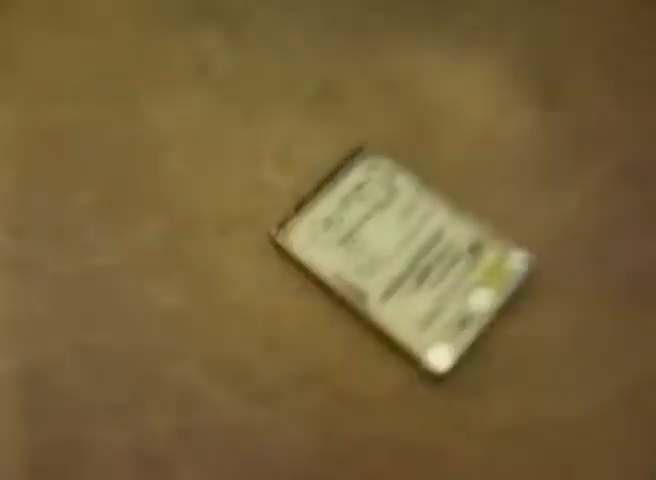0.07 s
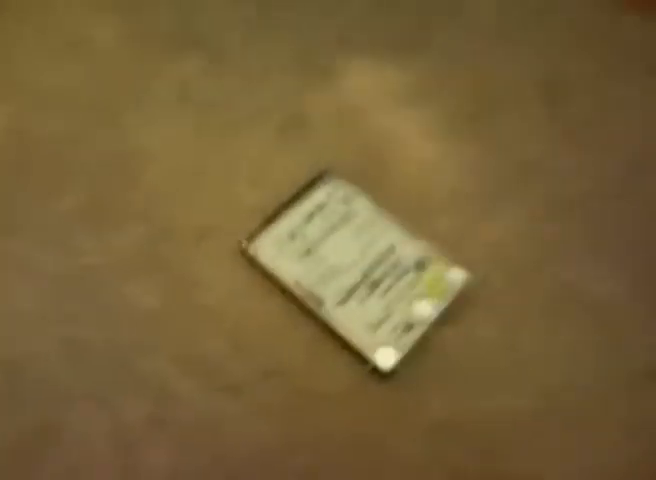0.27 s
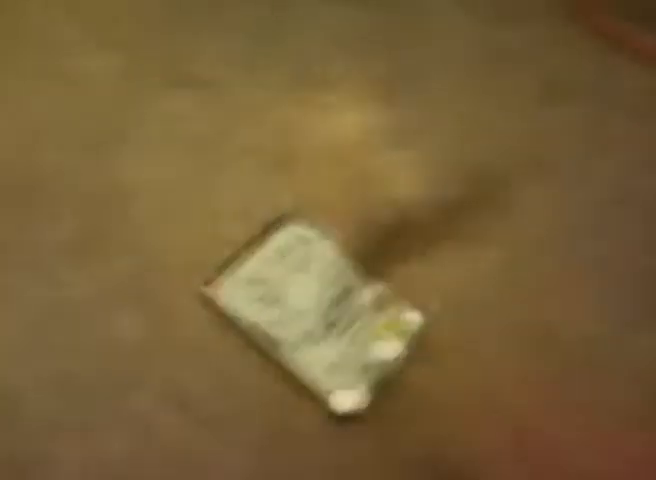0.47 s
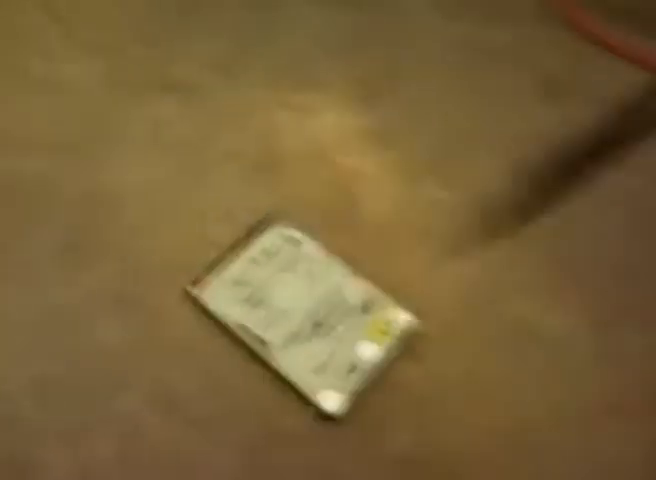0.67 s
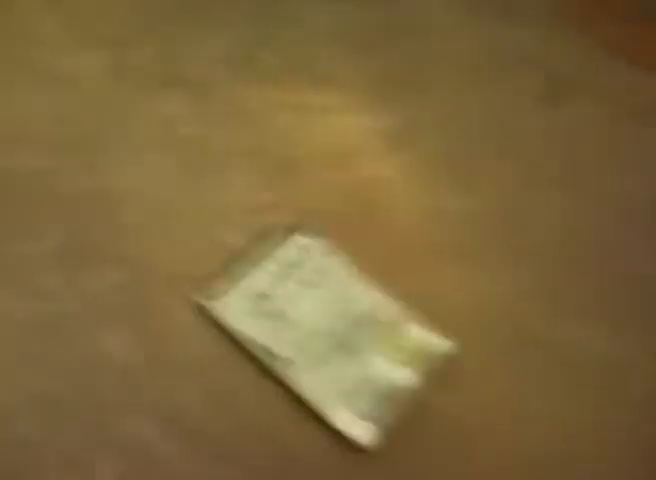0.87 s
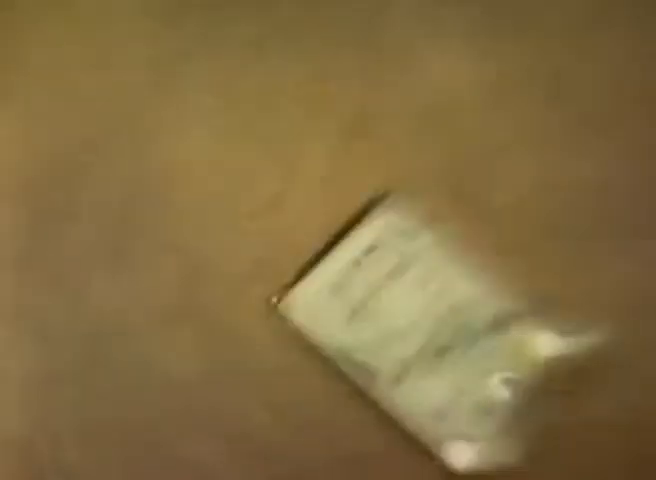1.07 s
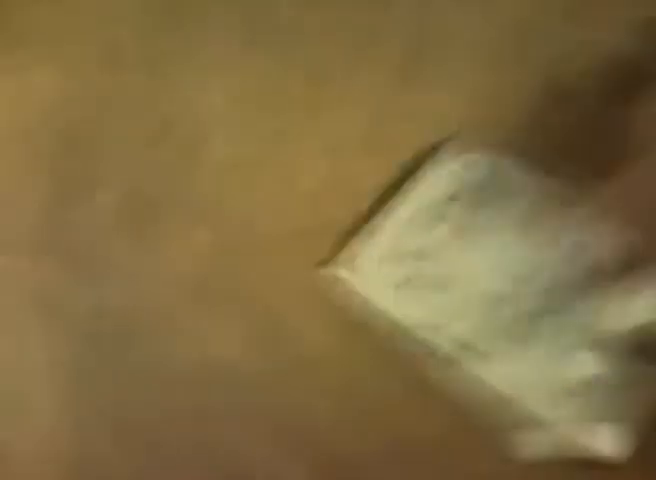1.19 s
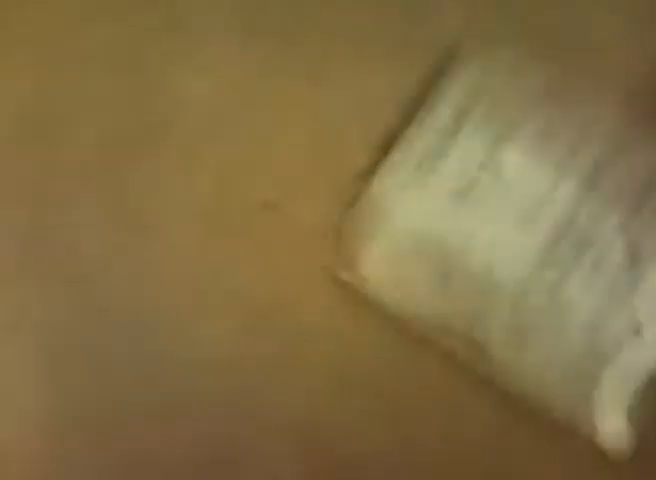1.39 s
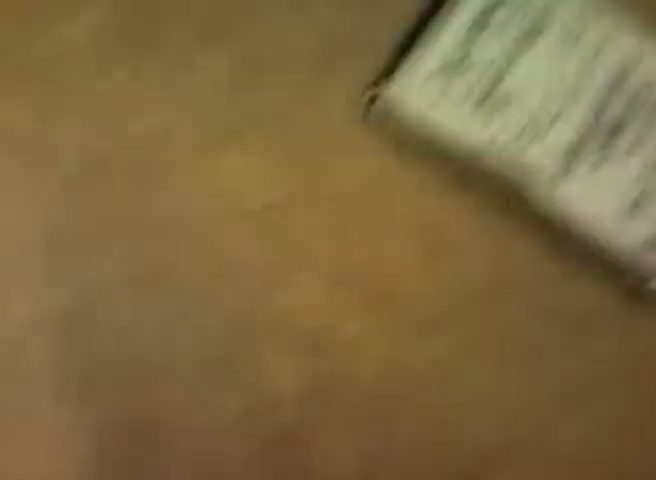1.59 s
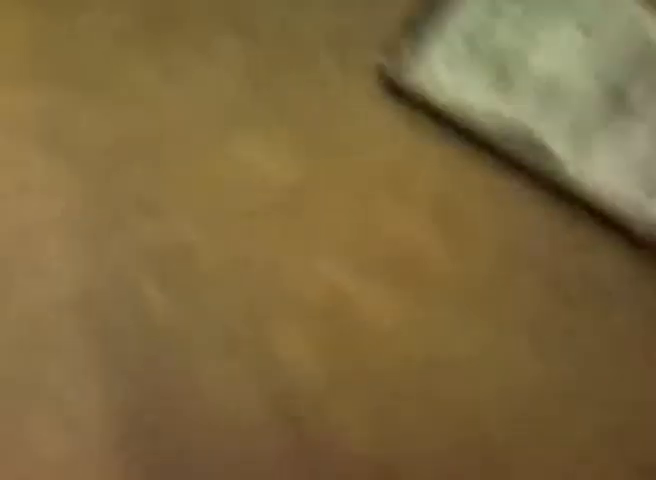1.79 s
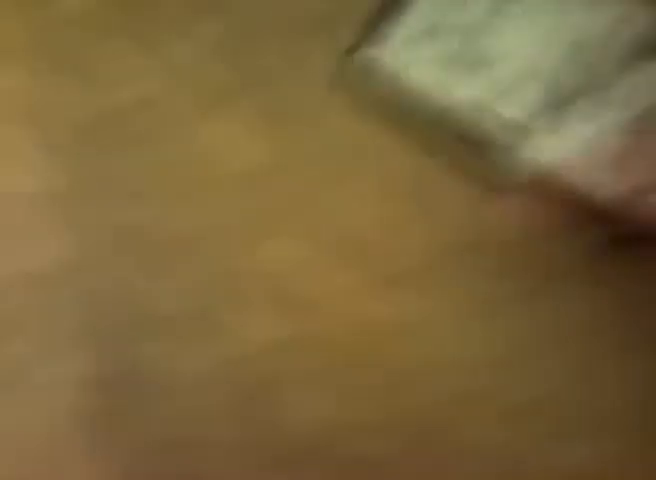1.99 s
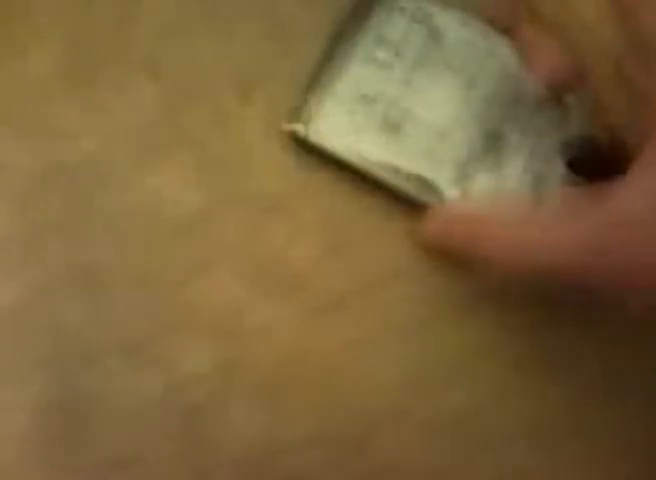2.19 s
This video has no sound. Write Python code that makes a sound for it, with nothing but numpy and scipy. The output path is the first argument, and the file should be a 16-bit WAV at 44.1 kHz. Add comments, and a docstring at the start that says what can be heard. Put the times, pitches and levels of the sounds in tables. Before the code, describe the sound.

Two loud hammer blows crack against a hard drive on concrete, followed by light clatter.

```python
"""Quiet hiss and a faint hum, then two hammer blows slam into a hard drive on a concrete floor.
Each blow makes it bounce and rattle: frame and lid crack and ring, the floor thuds, and a small hard
room answers. Small ticks and gritty scrapes follow, then a sharp clack and some clatter as the drive
is moved. It all sits in a narrow, telephone-like band; the loud blows clip with a harsh crunch."""
import sys
import numpy as np
from scipy import signal
from scipy.fft import rfft, irfft
from scipy.io import wavfile
from scipy.ndimage import uniform_filter1d

SR = 44100
rng = np.random.default_rng(int(sys.argv[2]) if len(sys.argv) > 2 else 0)


def transcribe(signal):
    """Save signal, clipped to [-1, 1], as a 16-bit WAV file at the path in sys.argv[1]."""
    frames = np.atleast_2d(signal).T
    limited = np.clip(frames, -1, 1)
    pcm = np.round(limited * 32767).astype(np.int16)
    wavfile.write(sys.argv[1], SR, pcm)


N = 99225
T = np.arange(N) / SR
HZ = np.maximum(np.arange(N + 1) * SR / (2 * N), 1)

# EQ of the steady hiss: frequency_hz, gain_db
HISS_EQ = [(20, -14.5), (45, -5.5), (90, 5), (170, -14.5), (260, -7.5), (500, -0.5), (780, 2), (1100, -1),
           (2000, -0.5), (3600, -1), (4200, -11.5)]
# EQ of the duller noise that swells over it: frequency_hz, gain_db
SWELL_EQ = [(30, -5), (90, 2.5), (200, -17.5), (600, 1.5), (1400, 0.5), (2200, -5), (4000, -8)]
# fader ride of that swell: time_s, level_db
SWELL_FADER = [(0, -42.5), (.22, -43.5), (.55, -44.5), (.76, -54.5), (.98, -42.5), (1.2, -42),
               (1.42, -44.5), (1.56, -52), (1.73, -52), (1.8, -43), (2.25, -43.5)]
# hammer blows and their bounces: start_s, level_db, tilt_db_per_octave, lid_share (0 frame, 1 lid)
BLOW_HITS = [(0.2417, -0.5, -2, 0), (0.2496, 1.5, -0.5, 0.1), (.257, -3, -1, 0.29),
             (.265, -2.5, -3.5, 0.12), (.275, -3, -2, 0.56), (.285, 1, -0.5, 0), (0.2939, 2.5, 4, .05),
             (.311, -4.5, -2, 0.23), (.3285, -12.5, 7, 0), (1.0161, -4.5, -3.5, 0.38),
             (1.0221, 1, -1.5, 0.6), (1.031, -8.5, 0.5, 0.29), (1.042, -5.5, 0.5, 1), (1.059, -10, -4, .9),
             (1.0687, -4.5, 0.5, 0.39)]
# the drive's ring, struck on frame or lid: pitch_hz, frame_db, lid_db, t60_s
DRIVE_MODES = [(632, -15.5, -5, 0.38), (750, -9, -17, 0.26), (912, -12.5, -9.5, 0.18),
               (1100, -26.5, -15, .2), (1229, 3, -13, 0.18), (1399, 3.5, -20, 0.2), (1523, -3, -18.5, 0.27),
               (1684, -8, -7, 0.2194), (1998, 0.5, -3, .2), (2520, -13, 1, .36), (2606, 0.5, -3, 0.23),
               (2874, -12.5, 4, 0.27), (3068, -14.5, -6.5, 0.2), (3587, 8, -4, 0.086)]
# EQ of the contact crack, also used for the grit: frequency_hz, gain_db
CONTACT_EQ = [(30, -14.5), (90, -28.5), (180, -15), (300, -7), (560, -0.5), (800, 0.5), (1300, 6.5),
              (2200, -0.5), (3000, 0), (3700, 2.5), (4200, -0.5)]
# decay of the small hard room: band_hz, t60_s
ROOM_DECAY = [(80, 0.49), (400, 0.34), (1400, 0.3), (3500, 0.32)]
# the floor taking the weight: start_s, pitch_hz, level_db
FLOOR_THUDS = [(0.283, 100, -8), (0.3041, 91, -6.5), (1.0258, 93.4, -3), (2.185, 91.5, -36.5)]
# light knocks of the drive and loose bits: start_s, level_db, tilt_db_per_octave
TAP_HITS = [(1.249, -18, 3.5), (1.276, -16.5, 4.5), (1.316, -27, -6), (1.357, -14.5, -3.5),
            (1.413, -38, 15.5), (1.429, -26.5, 8.5), (1.461, -27, 2), (1.8834, -14.5, 1), (1.895, -18, 1),
            (2.1677, 4.5, 2), (2.1743, -7.5, 5), (2.189, -13.5, -1.5), (2.2222, -6, -3.5),
            (2.2442, -3.5, -1.5)]
# damped resonances of the drive lying on the floor: pitch_hz, level_db, t60_s
DAMPED_MODES = [(1047, 0.5, 0.019), (2147, -0.5, 0.025), (2800, -5, .016), (3402, 1.5, 0.012),
                (3850, -13, 0.012)]
# slides of the drive over grit: start_s, length_s, level_db, tilt_db_per_octave
GRIT_SLIDES = [(1.255, .11, -39, -1), (1.40, 0.046, -37, 3.5), (1.884, 0.019, -38, -4),
               (2.18, 0.088, -30, -1)]

BAND_TOP_HZ = 3900
CLATTER_ROOM_DB = -11.5  # reverb send of the taps and scrapes


def undb(db):
    """Decibels to gain."""
    return 10 ** (np.asarray(db) / 20)


def unit(x):
    """Scale to an energy of one."""
    return x / np.sqrt(np.sum(x ** 2))


def unit_rms(x):
    """Scale to an RMS level of one."""
    return unit(x) * np.sqrt(N)


def decay(t60):
    """Envelope that falls 60 dB in t60 seconds."""
    return np.exp(-np.log(1000) * T / t60)


def curve(points):
    """Join (frequency_hz, value) points along a log frequency axis."""
    hz, value = np.array(points).T
    return np.interp(np.log(HZ), np.log(hz), value)


def colour(x, db):
    """Minimum-phase EQ, so nothing rings ahead of a hit."""
    cepstrum = irfft(db * np.log(10) / 20)
    cepstrum[1:N] *= 2
    cepstrum[N + 1:] = 0
    return irfft(rfft(x, 2 * N) * np.exp(rfft(cepstrum)))[:N]


def tilt(db_per_octave):
    """EQ of a harder or softer contact, pivoting at 1500 Hz."""
    return db_per_octave * np.log2(np.clip(HZ, 300, 4000) / 1500)


def add(out, start, x):
    """Mix x in from start seconds."""
    i = int(start * SR)
    out[i:] += x[:N - i]


def band_limit(x):
    """Steep high cut that leaves a narrow, telephone-like band."""
    rolloff = np.sqrt(1 + np.minimum(HZ / BAND_TOP_HZ, 2) ** 130)
    return irfft(rfft(x, 2 * N) / rolloff)[:N]


def noise():
    """White noise up to the high cut."""
    return band_limit(rng.standard_normal(N))


def background(hum_hz=770, waver_hz=5):
    """The bed: steady hiss, a faint wavering hum, and a duller noise that swells and fades."""
    waver = unit_rms(uniform_filter1d(rng.standard_normal(N), size=1500))
    hum = np.sqrt(2) * np.sin(2 * np.pi * np.cumsum(hum_hz + waver_hz * waver) / SR)
    fader_db = np.interp(T, *np.array(SWELL_FADER).T)
    swell = unit_rms(colour(noise(), curve(SWELL_EQ)))
    hiss = unit_rms(colour(noise(), curve(HISS_EQ)))
    return undb(-44.5) * hiss + undb(-53.5) * hum + undb(fader_db) * swell


def ring(modes, detune=0.0028):
    """Struck metal: decaying partials, with slightly new tuning and fresh phases on every hit."""
    out = np.zeros(N)
    for hz, db, t60 in modes:
        pitch_hz = hz * (1 + detune * rng.standard_normal())
        phase = np.pi * rng.standard_normal()
        out += undb(db) * decay(t60) * np.sin(2 * np.pi * pitch_hz * T + phase)
    return unit(out)


def hammer_blows(full_force_s=0.0027, crack_db=30, ring_db=13.5):
    """Each blow or bounce cracks and sets the frame and the lid ringing."""
    out = np.zeros(N)
    attack = np.minimum(T / full_force_s, 1) ** 2
    # the lid's crowded resonances brighten the crack around 2800 Hz
    lid_peak_db = 21.5 / (1 + ((HZ - 2800) / 630) ** 2)
    for start, db, slope, lid_share in BLOW_HITS:
        crack_eq = curve(CONTACT_EQ) + tilt(slope) + lid_share * lid_peak_db
        crack = unit(colour(noise() * decay(t60=0.055), crack_eq))
        metal = ring([(hz, (1 - lid_share) * frame_db + lid_share * lid_db, t60)
                      for hz, frame_db, lid_db, t60 in DRIVE_MODES])
        add(out, start, undb(db) * attack * (undb(crack_db) * crack + undb(ring_db) * metal))
    return in_room(out, send_db=-7.5)


def in_room(x, send_db, build_s=0.0047):
    """The direct sound plus diffuse reflections that build quickly and die away band by band."""
    spectrum, tail = rfft(noise(), 2 * N), np.zeros(N)
    for hz, t60 in ROOM_DECAY:
        band = curve([(centre, float(centre == hz)) for centre, _ in ROOM_DECAY])
        tail += irfft(spectrum * band)[:N] * decay(t60)
    tail *= 1 - np.exp(-T / build_s)
    tail = unit(tail) * np.sqrt(2 * BAND_TOP_HZ / SR)  # about unity gain below the high cut
    return x + undb(send_db) * signal.fftconvolve(x, tail)[:N]


def floor_thuds(rise_s=0.0078):
    """The low end: a few heavy cycles as the floor takes the weight."""
    out, age = np.zeros(N), T / rise_s
    bump = (age * np.exp(1 - age)) ** 4
    for start, hz, db in FLOOR_THUDS:
        add(out, start, -undb(db) * bump * np.sin(2 * np.pi * hz * T))
    return in_room(out, send_db=-15)


def taps(ring_db=2, snap_db=-2.5):
    """Ticks and clacks of the drive and loose bits: a choked ring under a snap of noise."""
    out = np.zeros(N)
    for start, db, slope in TAP_HITS:
        body = undb(ring_db) * ring(DAMPED_MODES)
        snap = undb(snap_db) * unit(noise() * decay(t60=0.035))
        add(out, start, undb(db) * colour(body + snap, tilt(slope)))
    return in_room(out, CLATTER_ROOM_DB)


def scrapes(grains_per_s=800, spread_db=3):
    """The drive drags over grit: dense, uneven grains of friction swell and fade with each slide."""
    out = np.zeros(N)
    for start, length, db, slope in GRIT_SLIDES:
        catches = rng.random(N) < grains_per_s / SR
        grains = catches * undb(spread_db * rng.standard_normal(N)) * rng.choice([-1, 1], N)
        grit = unit_rms(band_limit(colour(grains, curve(CONTACT_EQ) + tilt(slope))))
        arch = np.sqrt(np.abs(np.sin(np.pi * np.clip(T / length, 0, 1))))
        add(out, start, undb(db) * grit * arch)
    return in_room(out, CLATTER_ROOM_DB)


def scene():
    """Hits, clatter and the noise bed, mixed in mono."""
    return (hammer_blows() + floor_thuds() + taps() + scrapes() + background())[None]


def record(dry, ceiling=3.2, knee=7, top_hz=15800):
    """Clipping distortion: saturate, cut the highs, then flatten the peaks into a harsh crunch."""
    saturated = band_limit(ceiling * np.tanh(dry[0] / ceiling))
    flattened = saturated / (1 + np.abs(saturated) ** knee) ** (1 / knee)
    high_cut = signal.ellip(8, 0.2, 70, top_hz, fs=SR, output="sos")
    return signal.sosfilt(high_cut, flattened)[None]


dry = scene()
out = record(dry)
transcribe(out)
```